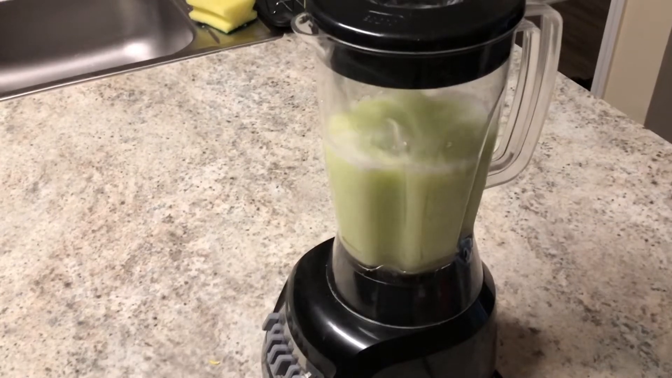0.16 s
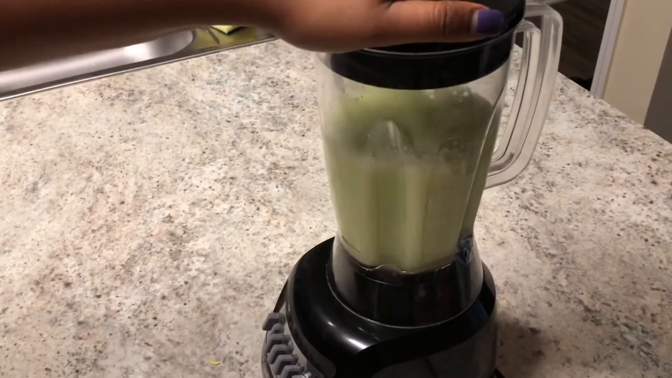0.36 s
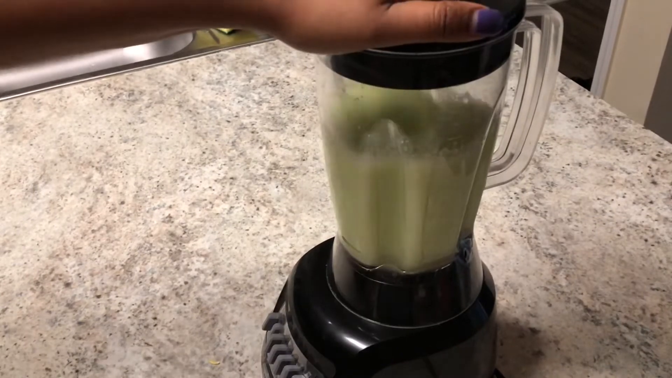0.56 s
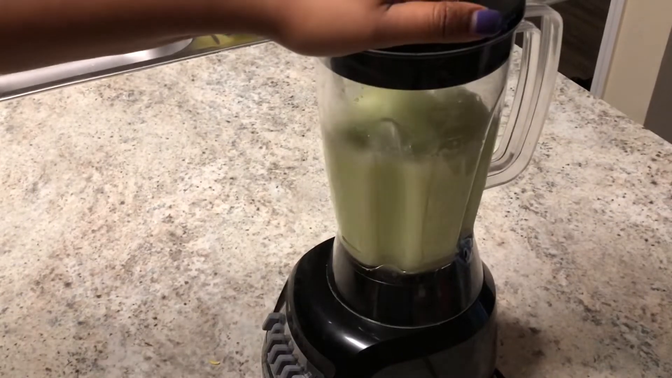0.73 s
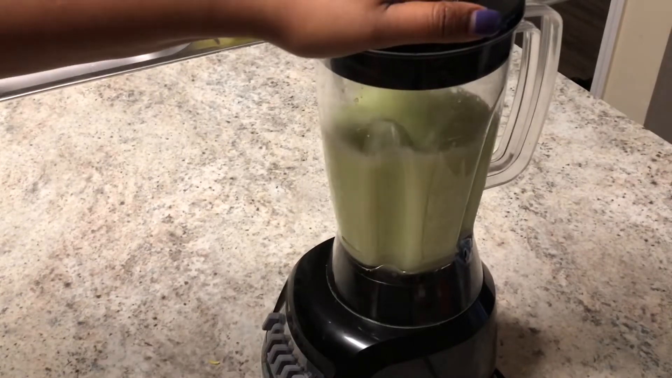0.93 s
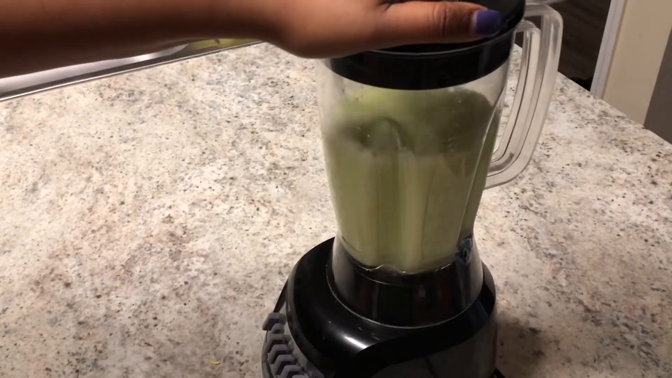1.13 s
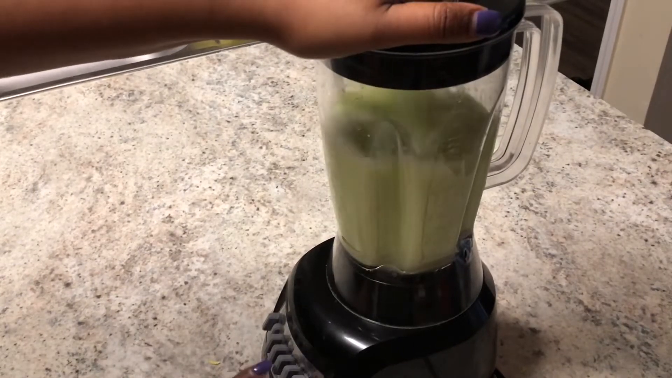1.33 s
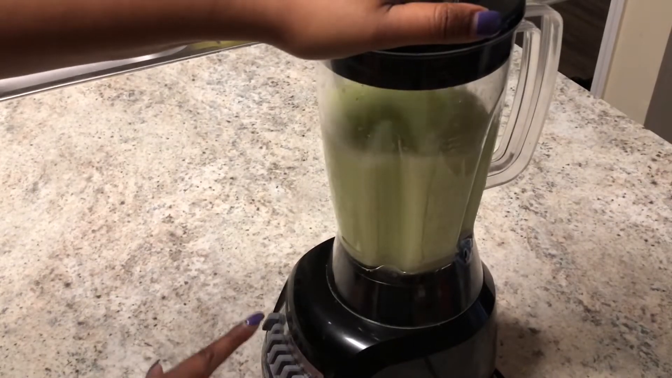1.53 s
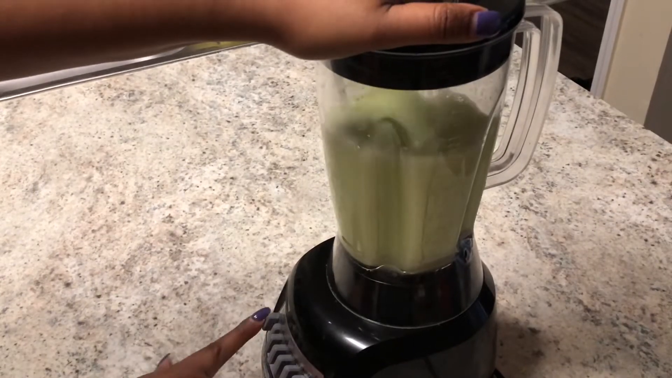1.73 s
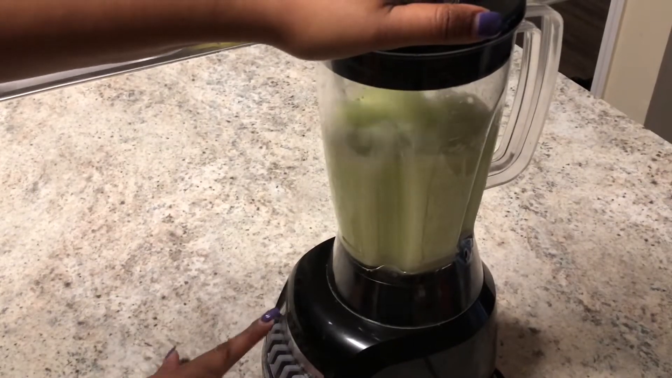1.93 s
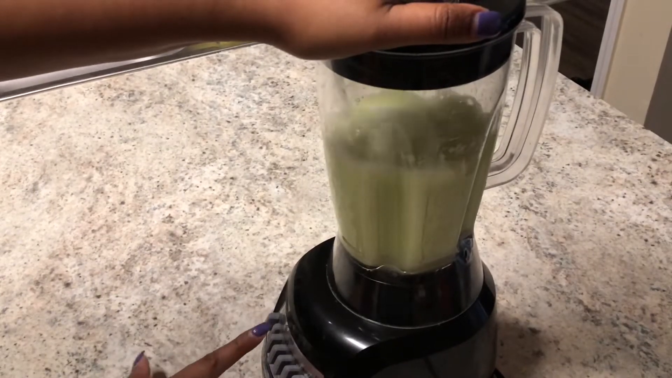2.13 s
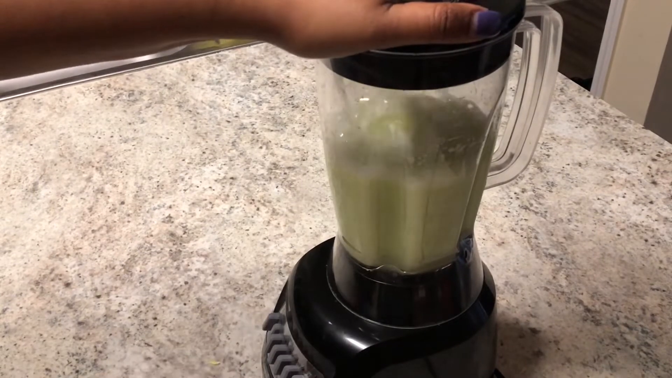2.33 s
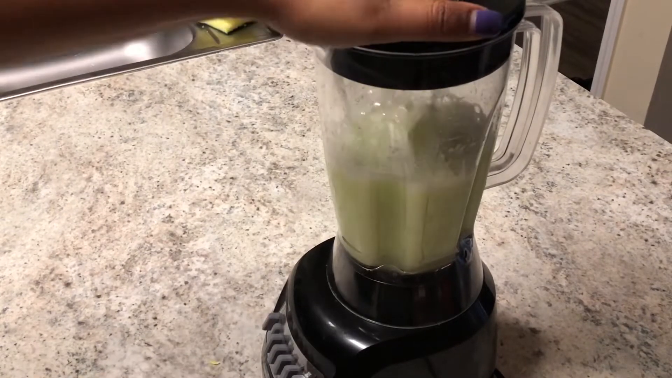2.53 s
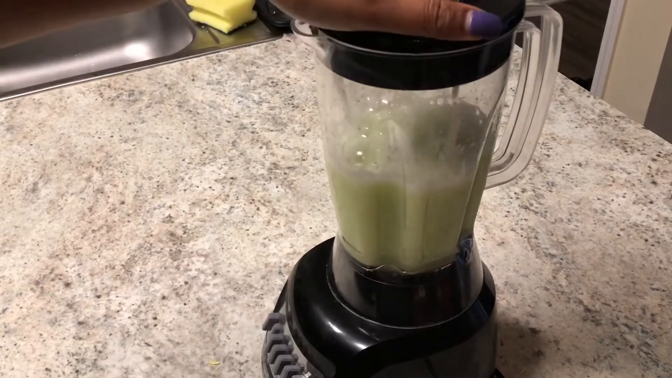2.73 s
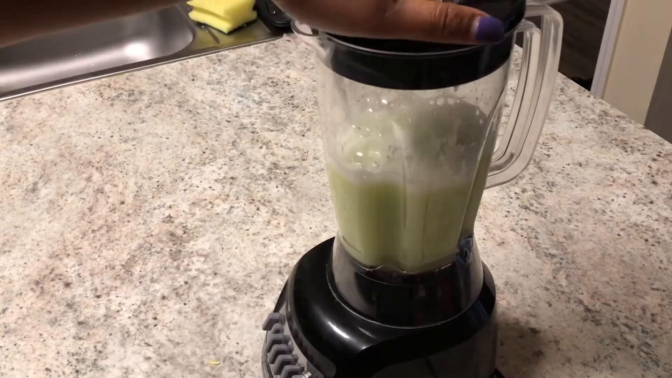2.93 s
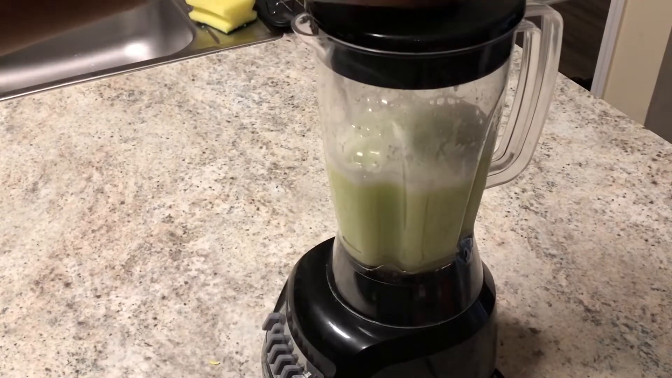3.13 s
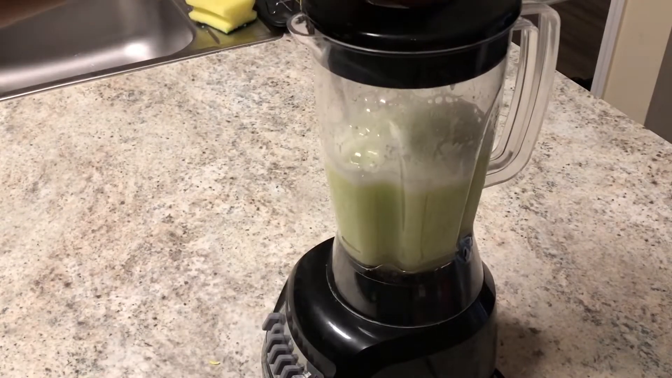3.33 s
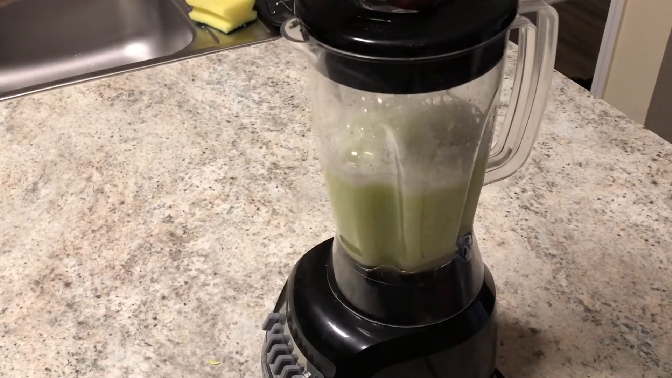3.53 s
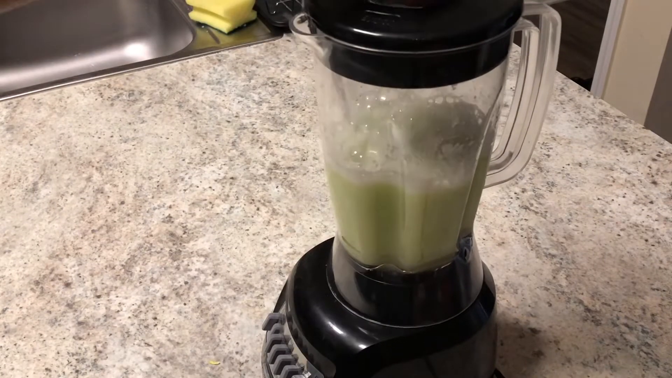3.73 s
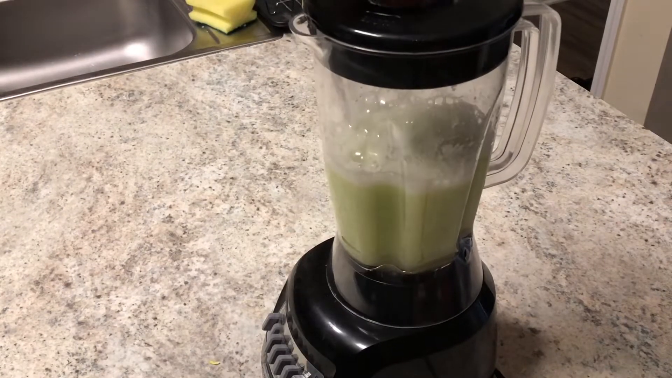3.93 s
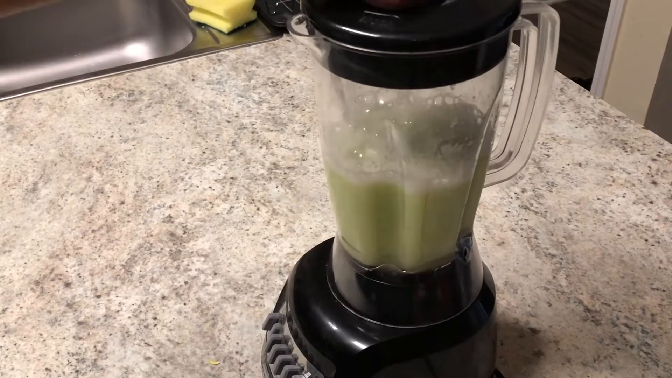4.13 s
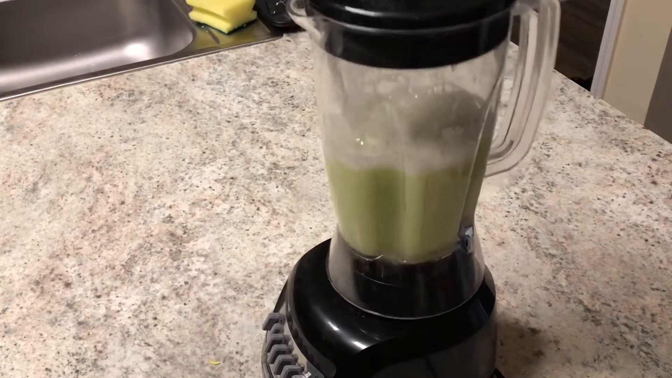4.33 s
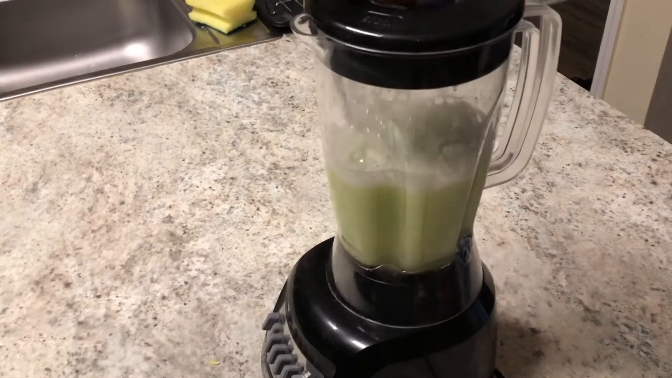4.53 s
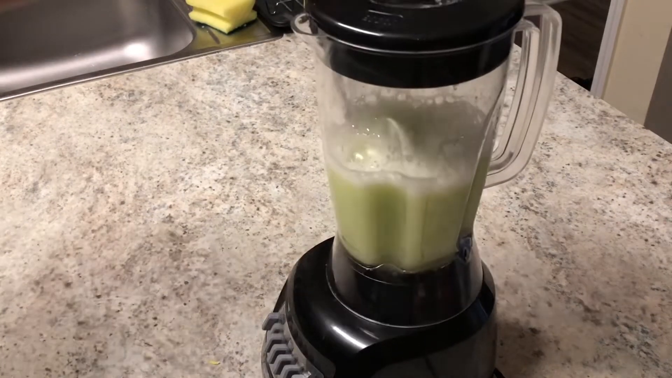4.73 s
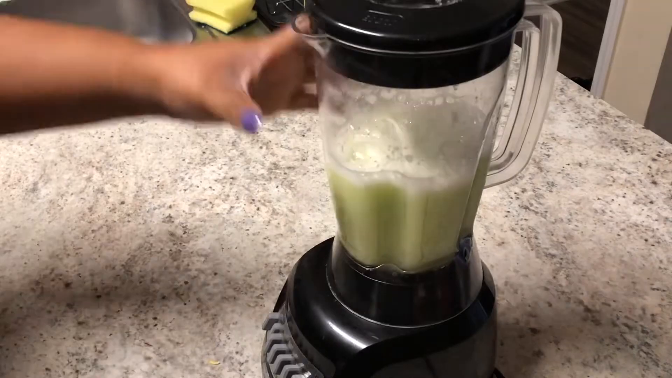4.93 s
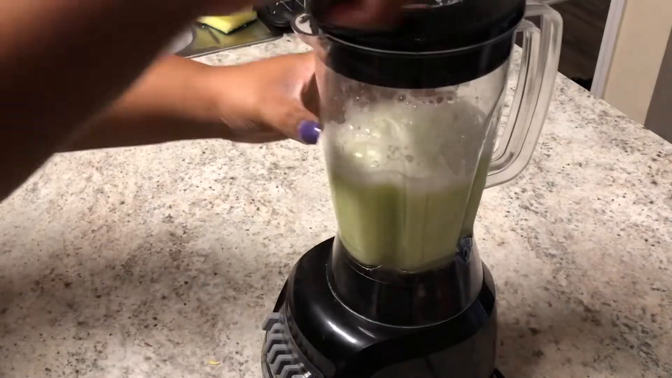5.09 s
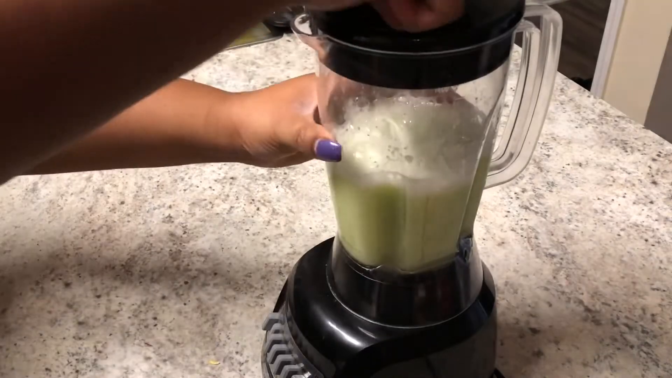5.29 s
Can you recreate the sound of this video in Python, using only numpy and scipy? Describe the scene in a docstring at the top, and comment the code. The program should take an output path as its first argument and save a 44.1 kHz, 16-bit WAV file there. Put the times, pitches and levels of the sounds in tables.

```python
"""Small kitchen: a countertop blender churns celery and water close by, with blade tones, motor whine
and a rush of spray. Its button snaps off, the blades coast to rest and the vortex falls in.
Then drips tick on the plastic and trapped air glugs up through the pulp, over a faint appliance hum;
hands grip the jar."""
import sys
import numpy as np
from scipy import signal
from scipy.fft import rfft, irfft, next_fast_len
from scipy.io import wavfile
from scipy.ndimage import map_coordinates

SR = 44100
rng = np.random.default_rng(int(sys.argv[2]) if len(sys.argv) > 2 else 0)


def bounce(signal):
    """Save signal as a 16-bit WAV file at the path given by the first command-line argument."""
    frames = np.transpose(np.atleast_2d(signal))
    limited = np.clip(frames, -1, 1)
    pcm = np.round(limited * 32767).astype(np.int16)
    wavfile.write(sys.argv[1], SR, pcm)


N = 240684
ON_S, OFF_S = 0.345, 1.974
RUN_HZ = 197.3  # mean shaft speed
SETTLE_S, SETTLE_DB_PER_S = 2.476, 130  # the liquid comes to rest
# Resonances of the filled jar: f/Hz, width/Hz, lift/dB
FILLED_JAR_PEAKS = [(215, 41, 8), (280, 25, 7), (625, 70, 5.5), (851, 68, 3.5), (1052, 26, 3),
                    (2150, 70, 1), (2830, 130, 0)]


def amp(db):
    """dB to gain."""
    return 10 ** (np.asarray(db) / 20)


def clock():
    """Sample times/s."""
    return np.arange(N) / SR


def after(s):
    """Time/s since s, zero before."""
    return np.maximum(clock() - s, 0)


def along(points, hz):
    """Interpolate (f/Hz, value) points on a log axis."""
    f, v = np.transpose(points)
    return np.interp(np.log(hz + 1), np.log(f + 1), v)


def lift(peaks, hz):
    """Boost/dB from a set of resonances."""
    return sum(db / (1 + (2 * (hz - centre) / width) ** 2) for centre, width, db in peaks)


def wobble(rate_hz):
    """Smooth random curve, rate_hz knots a second."""
    return map_coordinates(rng.standard_normal(4096), [clock() * rate_hz], mode="wrap")


def filtered(x, response):
    """Zero-phase filter with gain response(hz)."""
    size = next_fast_len(N + 8192)
    return irfft(rfft(x, size) * response(np.fft.rfftfreq(size, 1 / SR)), size)[..., :N]


def noise(spectrum, peaks=()):
    """Noise, rms 1: a broad (f/Hz, level/dB) spectrum plus resonances."""
    x = filtered(rng.standard_normal(N), lambda hz: amp(along(spectrum, hz) + lift(peaks, hz)))
    return x / np.sqrt(np.mean(x ** 2) + 1e-20)


def add(track, s, sound):
    """Mix sound into track at time s."""
    span = track[round(s * SR):][:len(sound)]
    span += sound[:len(span)]


def in_kitchen(sound, wet_db, near_db, near_t60_s=0.23):
    """Direct sound, quick reflections off jar and counter, and the room's tail."""
    # Room decay: f/Hz, t60/s
    decay = [(150, 0.21), (700, 0.24), (3000, 0.28), (8000, 0.46), (16000, 0.044)]
    hz, t, bands = signal.stft(rng.standard_normal(SR // 2), SR, nperseg=256)
    tail = signal.istft(bands * amp(-60 * t / along(decay, hz)[:, None]), SR, nperseg=256)[1]
    near = rng.standard_normal(len(tail)) * amp(-60 * np.arange(len(tail)) / SR / near_t60_s)
    response = amp(wet_db) * tail / np.linalg.norm(tail) + amp(near_db) * near / np.linalg.norm(near)
    response[0] += 1
    return signal.fftconvolve(sound, response)


def bite(rise_s=0.044):
    """0 to 1 as the blades take hold of the liquid."""
    return np.clip(after(ON_S) / rise_s, 0, 1) ** 1.27


def drag(first_s=0.565, lap_s=0.35):
    """Circling pulp pulls on the blades once a lap, -1 to 1; held after switch-off."""
    return np.cos(2 * np.pi * (np.minimum(clock(), OFF_S) - first_s) / lap_s)


def shaft_hz(sag_hz=2.7, lag_s=0.01, tau_s=0.515, friction_hz_per_s=117):
    """Shaft speed: sags under the pulp, then coasts down by liquid drag and bearing friction."""
    friction_hz = friction_hz_per_s * tau_s
    coast = np.exp(-after(OFF_S + lag_s) / tau_s)
    return np.maximum((RUN_HZ - sag_hz * drag() + friction_hz) * coast - friction_hz, 0)


def driven_db(layer, chop_start_s=1.42, chop_length_s=0.13):
    """Layer level from bite, drag, shaft speed and the chopping of the last chunks."""
    # Load response by layer: full-speed level/dB, change under drag/dB, once chopped/dB, speed exponent
    laws = {"pair": (-44, 2.5, 4, 0.96), "blades": (-2.5, 0.5, -1, 1.5), "whine": (-45.5, 2.5, -1, 1.5),
            "churn": (-33, 0.6, -2, 1.13), "spray": (-31.5, 0.2, -1.53, 1.66),
            "mist": (-30.5, 0.1, 0.3, 2.34), "finest mist": (-29.5, -0.16, -2.4, 2)}
    full_db, drag_db, chopped_db, power = laws[layer]
    chopped = np.clip(after(chop_start_s) / chop_length_s, 0, 1)
    gain = bite() * (shaft_hz() / RUN_HZ) ** power
    return full_db + drag_db * drag() + chopped_db * chopped + 20 * np.log10(np.maximum(gain, 1e-6))


def tone(turns, order, blur_rad):
    """One multiple of the shaft speed, rms 1, with wandering phase."""
    return np.sqrt(2) * np.sin(2 * np.pi * (order * turns + rng.random()) + blur_rad * wobble(35))


def motor(turns, mains):
    """Blade and shaft tones, shaken by the swirling load; pulsing torque adds sidebands."""
    # Radiation of order 2 by base and counter: f/Hz, gain/dB
    radiation = [(90, -20), (165, -18.5), (203, 5), (240, -10.5), (305, 0.5), (330, 0), (368, 9),
                 (395, -1.5), (420, 3.5)]
    # Four-blade tone: t/s, level/dB
    four_blade = [(0.4, -40), (0.578, -34.5), (0.598, -41), (1.328, -35), (1.608, -41.5), (1.646, -36.5),
                  (1.764, -53), (1.79, -33.5), (1.96, -41.5)]
    # Other shaft tones: order, level/dB
    overtones = [(1, -68.5), (3, -61), (5, -52), (6, -53.5), (8, -52), (12, -55), (14, -58), (16, -52.5)]
    # Mains buzz of the field coils: f/Hz, level/dB
    coils = [(120, -76), (240, -61.5), (360, -55.5), (480, -57.5)]
    # Tones that ring clearer once the blades stop whipping in air: order, level/dB
    coast_orders = [(4, -45.5), (6, -44), (8, -50.5), (12, -53)]
    speed_hz = shaft_hz()
    speed = speed_hz / RUN_HZ
    pair_db = driven_db("pair") + along(radiation, 2 * speed_hz) + 2.9 * wobble(14)
    blades = amp(pair_db) * tone(turns, 2, 0.18)
    four_db = np.interp(clock(), *np.transpose(four_blade)) + driven_db("blades") + 2.2 * wobble(18)
    blades += amp(four_db) * tone(turns, 4, 0.23)
    # each order swells as it slides through a jar resonance
    shaft = sum(amp(db + lift(FILLED_JAR_PEAKS, k * speed_hz) + 4.2 * wobble(12)) * tone(turns, k, 0.55)
                for k, db in overtones)
    whine = amp(driven_db("whine") + 4 * wobble(16)) * tone(turns, 20, 0.27)
    buzz = sum(amp(db + 1.5 * wobble(10)) * np.sqrt(2) * np.sin(2 * np.pi * (hz * clock() + rng.random()))
               for hz, db in coils)
    coasting = np.clip(after(OFF_S) / 0.05, 0, 1) * speed
    shaft += coasting * sum(amp(db + lift(FILLED_JAR_PEAKS, k * speed_hz)) * tone(turns, k, 0.33)
                            for k, db in coast_orders)
    turning = (blades + speed * shaft) * (1 + 0.5 * mains) + whine * (1 + 0.25 * mains)
    return turning * amp(-SETTLE_DB_PER_S * after(SETTLE_S)) + bite() * buzz * amp(-300 * after(OFF_S))


def liquid(turns, mains, collapse_s=2.425, collapse_width_s=0.019, finest_hz=7500):
    """Churn booms in the jar, spray hisses as the blades pass, and the vortex falls in with a slap."""
    # Spectra of churn, spray and mist: f/Hz, level/dB
    churn_spectrum = [(30, -49.5), (75, -43), (105, -33), (150, -17), (200, -19), (330, -9), (520, -5),
                      (620, 0), (900, -2), (1100, -3.5), (1300, -13), (1500, -12), (1900, -31)]
    spray_spectrum = [(900, -33), (1300, -3), (1550, 1.5), (2100, 2.5), (2600, 0), (2850, 2), (3060, -3.5),
                      (3600, 1.5), (3950, -3.5), (4300, -9), (5500, -35)]
    mist_spectrum = [(3000, -35.5), (4200, -3.5), (4650, 1), (5400, 2), (6300, -1.5), (7300, 0), (8500, -5),
                     (10000, -5), (13000, -6.5), (16000, -8.5)]
    slap_db = 4.5 * np.exp(-((clock() - collapse_s) / collapse_width_s) ** 2)
    churn_db, spray_db = driven_db("churn") + slap_db, driven_db("spray") + slap_db
    slowing = np.clip(1 - shaft_hz() / RUN_HZ, 0, 1)
    passing = 1 + 0.063 * np.sin(2 * np.pi * 2 * turns) + 0.051 * np.sin(2 * np.pi * turns)
    passing += 0.056 * mains
    # the rush breaks into separate splashes as the blades slow
    bursts_db = 0.7 * wobble(700) + (0.5 + 2.6 * slowing ** 2) * wobble(130)
    surges_db = (0.64 + 0.98 * slowing) * wobble(70) + 0.37 * wobble(11)
    churn = amp(churn_db + surges_db - 1.32) * noise(churn_spectrum, FILLED_JAR_PEAKS)
    spray = amp(spray_db + bursts_db + 0.39 * wobble(7) - 1.13) * noise(spray_spectrum, FILLED_JAR_PEAKS)
    hiss = noise(mist_spectrum)
    finest = filtered(hiss, lambda hz: 1 / (1 + (finest_hz / (hz + 1)) ** 4))
    mist = amp(driven_db("mist")) * (hiss - finest) + amp(driven_db("finest mist")) * finest
    mist *= amp(bursts_db + 0.35 * wobble(500) - 1.7)
    # slow blades roll larger, deeper eddies
    eddies = noise([(40, -54), (90, -14), (140, 1), (260, -0.5), (600, -5.5), (2000, -59)])
    slosh = amp(churn_db - 6) * slowing ** 2 * eddies
    rush = ((churn + spray + mist) * passing + slosh) * amp(-SETTLE_DB_PER_S * after(SETTLE_S))
    return in_kitchen(rush, wet_db=-12, near_db=-17, near_t60_s=0.03)[:N]


def room_tone():
    """Still air and the slightly unsteady hum of an appliance."""
    # Hum partials and air spectrum: f/Hz, level/dB
    partials = [(119, -78), (323, -82), (651, -73.5)]
    air = [(15, -98), (25, -57), (97, -15.5), (236, -8), (335, -7.5), (531, -10.5), (659, -8), (887, -16.5),
           (1020, -11.5), (1230, -15), (2690, -19.5), (6050, -26), (12900, -29.5), (16000, -35)]
    hum = sum(amp(db + 0.59 * wobble(7.4)) * np.sin(2 * np.pi * hz * clock() + 0.5 * wobble(14))
              for hz, db in partials)
    return np.sqrt(2) * hum + amp(-68) * noise(air)


def impulse(spectrum, size=2048):
    """Minimum-phase pulse with a given (f/Hz, level/dB) spectrum."""
    cepstrum = irfft(np.log(amp(along(spectrum, np.fft.rfftfreq(size, 1 / SR)))))
    cepstrum[1:size // 2] *= 2
    cepstrum[size // 2 + 1:] = 0
    return irfft(np.exp(rfft(cepstrum)))


def crack(spectrum, t60_s, tail_db=-60, tail_t60_s=0.2):
    """Sharp contact, peak 1: brief dense ringing, then a diffuse tail."""
    t = np.arange(SR // 4) / SR
    envelope = amp(-60 * t / t60_s) + amp(tail_db - 60 * t / tail_t60_s)
    burst = signal.fftconvolve(rng.choice([-1, 1], len(t)) * envelope, impulse(spectrum))
    return burst / np.abs(burst).max()


def ring_down(modes, t):
    """Decaying modes in random phase."""
    return sum(amp(db - 60 * t / t60_s) * np.sin(2 * np.pi * (hz * t + rng.random()))
               for hz, db, t60_s in modes)


def button():
    """The sprung switch snaps open and bounces, ringing the plastic base."""
    # Release and rebound: t/s, level/dB
    contacts = [(1.9735, -4.5), (1.9831, -15.5)]
    # Modes of the base: f/Hz, level/dB, t60/s
    base_modes = [(1800, -11.5, .022), (2595, -7.5, 0.0095), (3180, -3.5, 0.0099), (3740, -12.5, 0.018),
                  (5580, -7.5, 0.0068), (6400, -8, 0.017), (13400, -10, 0.013), (14200, -5.5, .005),
                  (15100, -2, .005)]
    out, t = np.zeros(N), np.arange(SR // 16) / SR
    for s, db in contacts:
        ring = ring_down(base_modes, t) * (1 - np.exp(-t / 0.00039))
        add(ring, 0, amp(-6) * crack([(100, -10.5), (2000, 4), (16000, -2)], t60_s=0.016))
        add(out, s, amp(db - 3) * in_kitchen(ring, wet_db=-8.5, near_db=-13.5))
    return out


def tick(bright_db, ping_db=-35, ping_hz=9130):
    """Small hard contact on the plastic, with a thin ping."""
    body_db, edge_db = -8.5 - 0.71 * bright_db, -18 + 0.69 * bright_db
    colour = [(200, body_db), (700, body_db + 5.5), (1100, body_db + 7.5), (1500, body_db + 8.5),
              (2500, body_db + 8), (3600, body_db / 2 - 0.5), (4300, body_db / 2 - 3.5),
              (5500, -8.5), (7000, -12.5), (9000, edge_db), (16000, edge_db - 11)]
    hz = np.geomspace(200, 16000, 96)
    wall_hz = 2960 * np.exp(0.39 * rng.standard_normal())  # resonance shifts with the spot hit
    spectrum = np.transpose([hz, along(colour, hz) + lift([(wall_hz, 470, 1.5)], hz)])
    sound = crack(spectrum, t60_s=0.0095, tail_db=-19.5 - 0.18 * bright_db, tail_t60_s=0.23)
    t = np.arange(SR // 5) / SR
    add(sound, 0, amp(ping_db - 60 * t / 0.058) * np.sin(2 * np.pi * ping_hz * t))
    return sound


def drips(patter_span_s=(2.36, 2.54), patter_fade_db_per_s=56, foam_span_s=(2.9, 4.9)):
    """Splashes patter as the vortex falls in; then drops tick on the jar and foam bursts faintly."""
    # Drops of juice: t/s, level/dB, brightness/dB, ping/dB
    drops = [(2.713, -54, 12, -35), (3.034, -52.5, 2, -35), (3.22, -41.5, 11, -19), (3.249, -47, 2, -14),
             (3.274, -41.5, -15, -30), (3.2932, -40, 4, -32), (3.3094, -46, 12, -26),
             (3.378, -44.5, 17, -28), (3.397, -53, 28, -27), (3.492, -48, 18, -27),
             (3.8353, -37.5, 13, -10), (3.8805, -38.5, -1, -26), (3.9021, -31, 4, -40),
             (4.0148, -40.5, 15, -25), (4.277, -42, -2, -25), (4.808, -37, 25.5, -26),
             (4.839, -50, -5, -35), (4.866, -50, 24, -20)]
    out = np.zeros(N)
    for s, db, bright_db, ping_db in drops:
        add(out, s, amp(db) * tick(bright_db, ping_db))
    for s in rng.uniform(*foam_span_s, 10):
        add(out, s, amp(-57.5 + 2.5 * rng.standard_normal()) * tick(2 + 8 * rng.standard_normal()))
    for s in rng.uniform(*patter_span_s, 12):
        add(out, s, amp(-36 - patter_fade_db_per_s * (s - patter_span_s[0])) * tick(bright_db=4))
    return out


def jar_ring(pitch_hz, t):
    """The jar rings, its modes driven hardest near the pitch of the blow."""
    # Jar modes: f/Hz, level/dB, t60/s
    modes = [(298, -6, 0.065), (400, -2, 0.059), (444, 4, 0.021), (577, -2, 0.058), (658, -5.5, 0.11),
             (826, 0.5, 0.026), (1000, -13, 0.039), (1150, -12, 0.025)]
    hz, mode_db, t60_s = np.transpose(modes)[:, :, None]
    strength_db = mode_db - 5 * np.log2(hz / pitch_hz) ** 2 + rng.normal(0, 2.3, hz.shape)
    cycles = hz * t * (1 + 0.019 * rng.standard_normal(hz.shape)) + rng.random(hz.shape)
    return np.sum(amp(strength_db - 60 * t / t60_s) * np.sin(2 * np.pi * cycles), axis=0)


def glugs():
    """Each air pocket bursts with a tick, rings with rising pitch, wakes the jar and thumps the liquid."""
    # Air pockets: t/s, level/dB, bubble f/Hz, bubble t60/s, bursting film level/dB, film brightness/dB
    pockets = [(2.590, -34, 577, 0.038, -48, 0), (3.047, -51, 650, 0.021, -47, -11.5),
               (3.219, -41.5, 603, 0.031, -55, 0), (3.420, -48, 613, .015, -51.5, -14),
               (3.805, -48.5, 586, .027, -56, -12), (3.847, -39, 534, 0.026, -43.5, -3),
               (4.030, -42, 656, 0.017, -40.5, 3), (4.061, -40.5, 736, 0.023, -47.5, -10),
               (4.083, -45, 770, 0.02, -56, -8), (4.225, -44, 476, 0.011, -44, -24),
               (4.318, -42.5, 364, 0.064, -57, -10), (4.349, -40.5, 600, 0.05, -55, -6),
               (4.400, -33, 530, 0.022, -29, -0.5), (4.477, -29, 400, 0.007, -30.5, -3),
               (4.5097, -19, 610, 0.015, -18, 1.5), (4.6, -28, 875, 0.032, -34.5, -1),
               (4.68, -44, 396, 0.029, -48, 18), (4.777, -46.5, 634, 0.03, -57, -10)]
    # Deep modes of the liquid: f/Hz, level/dB, t60/s
    liquid_modes = [(127, -6, 0.067), (193, 4, 0.051), (255, -13, 0.026)]
    splat_spectrum = [(100, -22), (300, 13), (700, 8.5), (1100, 0), (2500, -7), (6000, -46)]
    out, t = np.zeros(N), np.arange(SR // 4) / SR
    for s, db, bubble_hz, t60_s, film_db, bright_db in pockets:
        bubble = amp(9 - 60 * t / t60_s) * np.sin(2 * np.pi * bubble_hz * t * (1 + 2.3 * t))
        ring = (bubble + jar_ring(bubble_hz, t)) * (1 - np.exp(-t / 0.00068))
        ring /= np.abs(ring).max()
        # a low thump comes with each glug, stronger for loud ones
        thump = (1 - np.exp(-t / 0.002)) ** 2 * ring_down(liquid_modes, t)
        add(ring, 0.006, amp(-13 + 0.22 * (db + 42)) * thump)
        add(ring, 0, amp(-9.5) * crack(splat_spectrum, t60_s=0.048))
        add(out, s, amp(db - 3.5) * in_kitchen(ring, wet_db=-5.5, near_db=-17))
        add(out, s, amp(film_db) * tick(bright_db))
    return out


def grips():
    """Hands land softly on jar and lid, fingertips tapping the plastic."""
    # Touches: t/s, level/dB, f/Hz, tap level/dB, tap brightness/dB
    touches = [(5.198, -40, 660, -51, -23), (5.221, -46.5, 635, -38, 0), (5.368, -56.5, 600, -50.5, 8.5),
               (5.402, -46, 600, -48.5, -17), (5.419, -41, 600, -36, -39)]
    out, t = np.zeros(N), np.arange(SR // 4) / SR
    for s, db, pitch_hz, tap_db, bright_db in touches:
        ring = jar_ring(pitch_hz, t) * (1 - np.exp(-t / 0.00072))
        add(out, s, amp(db - 3.5) * in_kitchen(ring / np.abs(ring).max(), wet_db=-4, near_db=-21))
        add(out, s, amp(tap_db) * tick(bright_db))
    return out


def scene():
    """One shaft drives tones and liquid; the 120 Hz mains pulsing ends at switch-off."""
    turns = np.cumsum(shaft_hz()) / SR
    mains = np.sin(2 * np.pi * 120 * clock()) * amp(-300 * after(OFF_S))
    blender = motor(turns, mains) + liquid(turns, mains) + button() + drips() + glugs() + grips()
    # deep bass is rolled off below about 100 Hz
    mono = filtered(blender, lambda hz: 1 - 0.95 / (1 + (hz / 100) ** 10))
    return np.tile(mono + room_tone(), (2, 1))


def record(dry):
    """The microphone opens with a 12 ms fade as the motor starts and passes nothing above 16150 Hz."""
    opening = np.clip(after(ON_S) / 0.012, 0, 1)
    return filtered(dry * opening, lambda hz: np.clip((16150 - hz) / 400, 0, 1))


dry = scene()
out = record(dry)
bounce(out)
```